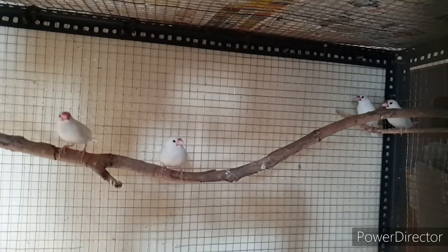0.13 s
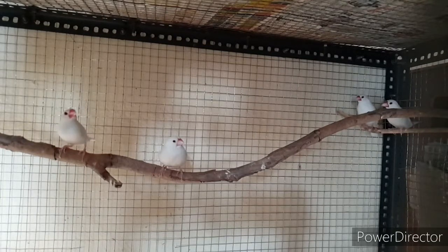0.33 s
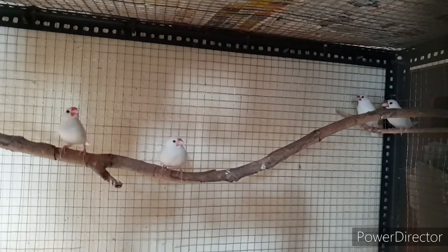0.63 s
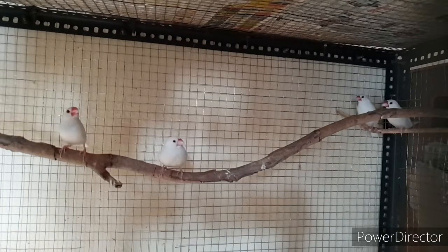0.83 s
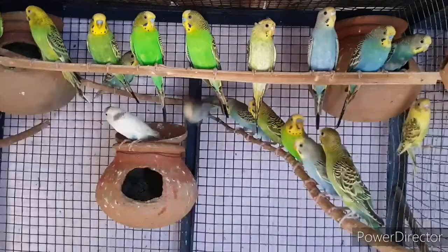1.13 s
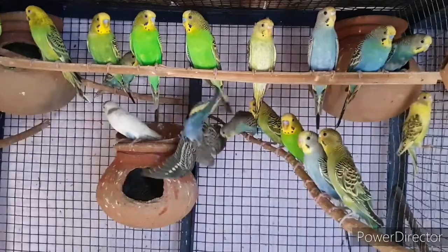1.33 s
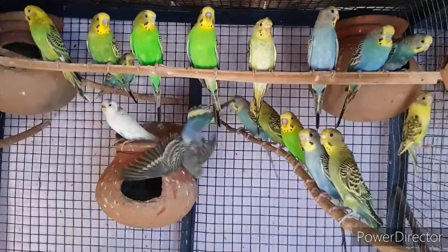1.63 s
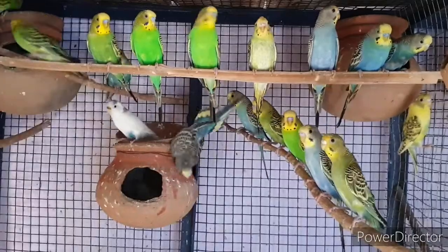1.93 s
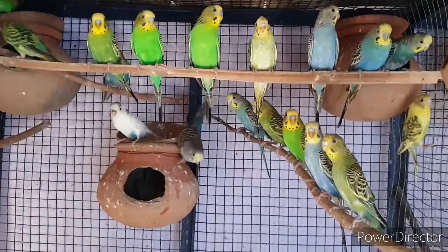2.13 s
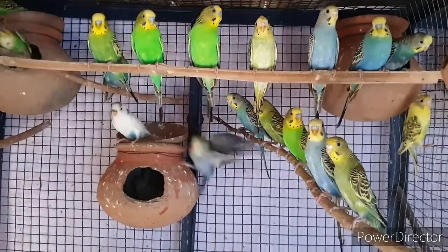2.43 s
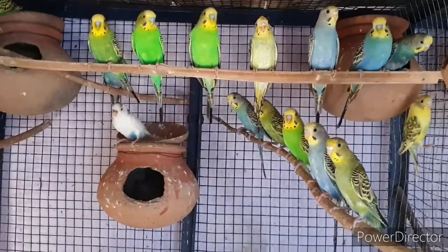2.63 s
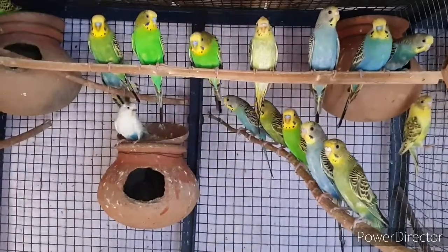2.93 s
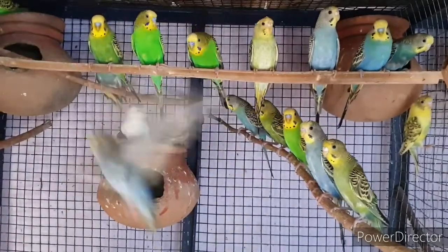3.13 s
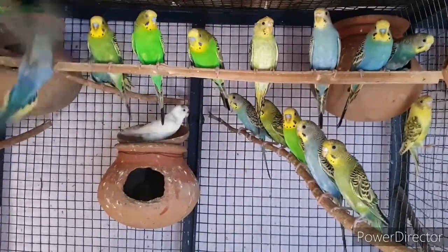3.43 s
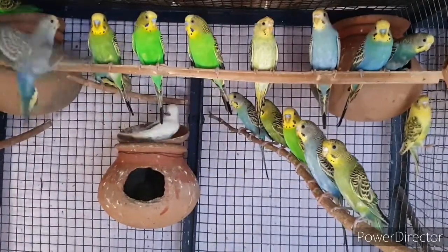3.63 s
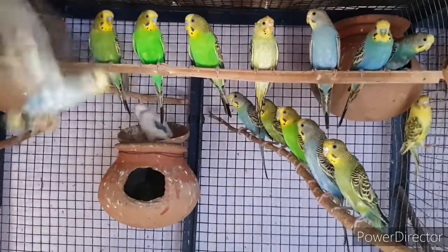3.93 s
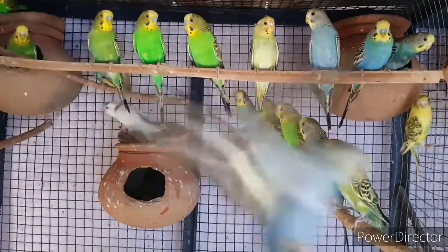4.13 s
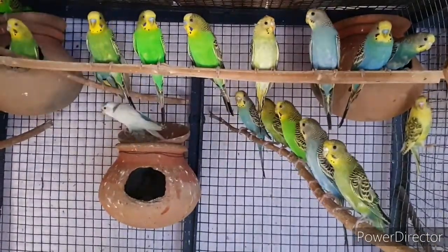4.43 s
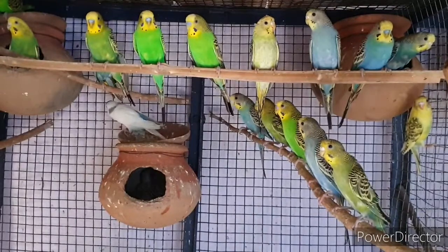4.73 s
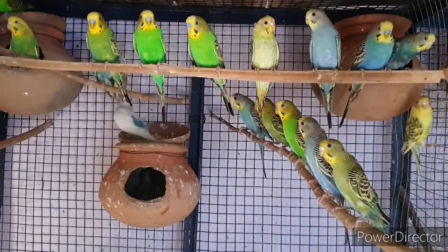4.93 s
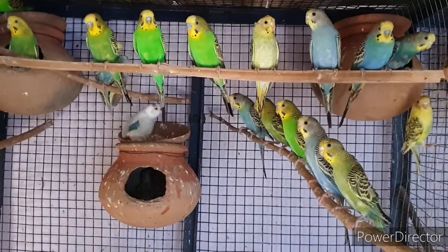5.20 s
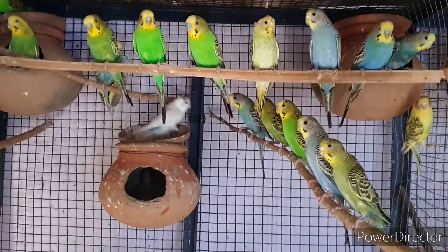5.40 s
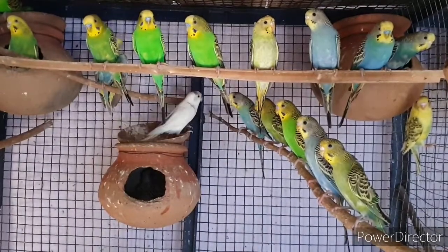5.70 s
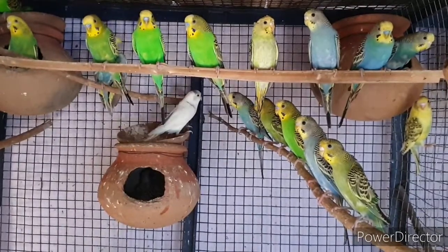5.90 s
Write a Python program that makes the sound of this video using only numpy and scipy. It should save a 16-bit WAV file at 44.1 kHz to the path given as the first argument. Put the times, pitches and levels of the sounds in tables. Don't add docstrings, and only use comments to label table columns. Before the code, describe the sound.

From 0 to 1.17 s there is only a faint, dull low hush, with distant muffled knocks around 0.1 and 0.4 s, the last ringing softly. The scene then switches abruptly to a close, hard-walled cage: a parakeet scolds in ten harsh squawks until 2.73 s, mixing short barks and longer throbbing rasps, loudest near 1.4-2.1 s, with light fluttering and hollow clay-pot puffs beneath. From 2.7 to 3.3 s a long wing pass whooshes by with feather hiss; sharp slaps and claw knocks follow near 3.5 s. Faint gliding chirps come around 3.9-4.1 s. Heavier wingbeat bursts at 4.1-4.7 s thump and hiss, then crisp slaps and hollow pot hoots at 4.8-5.2 s. Activity drops; a sharp landing slap with clicks at 5.5 s, brief gritty rustles and tiny high chirps follow, fading into quiet with a barely audible thin whine and faint hollow puffs near 5.8 s.

```python
import sys
import numpy as np
from scipy import signal
from scipy.fft import rfft, irfft, next_fast_len
from scipy.io import wavfile
from scipy.ndimage import uniform_filter1d

SR = 44100
rng = np.random.default_rng(int(sys.argv[2]) if len(sys.argv) > 2 else 0)


def natural_amplitude(level_db):
    exponent = np.asarray(level_db, float) / 20
    return 10 ** exponent


def transcribe(u):
    v = np.clip(np.atleast_2d(u).T, -1, 1)
    q = np.round(v * 32767).astype(np.int16)
    wavfile.write(sys.argv[1], SR, q)


N = 267201
T = np.arange(N) / SR
WIDE = next_fast_len(N)
HZ = np.fft.rfftfreq(WIDE, 1 / SR)
CUT_S = 1.166

# start_s, length_s, gain_db, second partial start_hz, end_hz
SQUAWK_CALLS = [
    (1.165, 0.056, 1.5, 4480, 4000),
    (1.213, 0.14, 3, 5140, 5600),
    (1.392, 0.074, 4, 4430, 4730),
    (1.518, 0.079, 3.5, 4476, 4860),
    (1.652, .085, 2, 4370, 5050),
    (1.806, 0.13, 3, 5270, 4900),
    (2.004, 0.12, 2.5, 5063, 5100),
    (2.321, .066, 2, 4700, 5200),
    (2.448, 0.076, 2, 5270, 4600),
    (2.613, 0.12, 2.5, 4690, 5300),
]
# pitch_hz, level_db (per Hz)
WHOOSH_COLOUR = [(150, -8.5), (250, -0.5), (410, -4.5), (530, -2), (780, -5), (1200, -11), (1560, -16),
                 (2640, -120)]
# pitch_hz, level_db (per Hz)
HISS_COLOUR = [(590, -1.5), (1000, -9.5), (1210, -2), (2420, -2.5), (2780, -1), (4950, 0.5), (6740, -5),
               (7800, -13), (10100, -115), (17200, -120)]
# pitch_hz, level_db (per Hz)
SHEEN_COLOUR = [(4710, -23.5), (8100, -10.5), (9200, -2), (10800, 4), (12500, 1.5), (14800, -3), (16000, 2)]


def rms_one(x):
    return x / np.sqrt(np.mean(x ** 2) + 1e-20)


def at_hz(points, hz):
    table = np.array(points)
    return np.interp(np.log(hz + 1), np.log(table[:, 0]), table[:, 1])


def drift(rate_hz, size=N):
    r = np.exp(-2 * np.pi * rate_hz / SR)
    return rms_one(signal.lfilter([1], [1, -2 * r, r * r], rng.standard_normal(size + 9000))[9000:])


def band(x, low_hz, high_hz):
    return signal.sosfilt(signal.butter(2, [low_hz, high_hz], "band", fs=SR, output="sos"), x)


def filtered(x, gain):
    return irfft(rfft(x, WIDE) * gain, WIDE)[..., :N]


def air(spectrum, alike=0.95, patchy_db=0, patch_hz=20):
    # pitch_hz, likeness (-1 to 1)
    port_likeness = [(60, -0.074), (180, 0.88), (550, 0.69), (1650, -0.24), (4970, 0.044), (15000, -0.37)]
    shared = np.clip(alike * at_hz(port_likeness, HZ), 0, 1)
    mid, side = rfft(rng.standard_normal((2, WIDE)))
    both = np.sqrt(1 + shared) * mid + np.sqrt(1 - shared) * side * [[1], [-1]]
    both = both * natural_amplitude(at_hz(spectrum, HZ))
    if not patchy_db:
        return rms_one(irfft(both, WIDE)[:, :N])
    place = 4 * np.log2(HZ + 1) % 6
    out = 0
    for k in range(6):
        window = np.clip(1 - np.abs((place - k + 3) % 6 - 3), 0, 1)
        out = out + irfft(both * window, WIDE)[:, :N] * natural_amplitude(patchy_db * drift(patch_hz))
    return rms_one(out)


def even(x):
    return x / np.sqrt(uniform_filter1d(x ** 2, size=900) + 1e-12)


def spans(calls):
    for s, length, *_ in calls:
        a, b = int(s * SR), int((s + length) * SR)
        yield slice(a, b), np.linspace(0, 1, b - a), signal.windows.tukey(b - a, 0.05)


def glide(start, end, t):
    return start + (end - start) * t


def phase(hz):
    return np.cumsum(2 * np.pi * hz / SR)


def aviary():
    # pitch_hz, level_db (per Hz)
    hush_colour = [(12, -27), (20, 10.5), (46, -10), (101, -16), (260, -21), (315, -27), (462, -22),
                   (694, -25.5), (789, -19), (936, -38), (1040, -46), (1320, -30), (1740, -27.5),
                   (2900, -36), (3300, -55), (4290, -84), (7260, -120)]
    # time_s, level_db, t60_s
    far_hits = [
        (0.116, -61, 0.51),
        (.385, -63, 0.35),
        (0.446, -59, 0.96),
    ]
    # centre_hz, width_hz, level_db
    wall_modes = [(750, 260, -2.5), (1340, 220, 2), (1770, 490, 0)]
    colour = sum(natural_amplitude(db) / (1 + (2 * (HZ - centre) / width) ** 4) for centre, width, db in wall_modes)
    ring = rms_one(filtered(rng.standard_normal((2, WIDE)), colour))
    fade = 0
    for s, level_db, t60 in far_hits:
        onset = np.clip((T - s) / 0.004, 0, 1)
        fade = fade + onset * natural_amplitude(level_db - 60 * np.abs(T - s) / t60)
    hush = natural_amplitude(-56.5 - 2.9 * T + 0.4 * drift(1.2)) * air(hush_colour, alike=0.14)
    return (hush + fade * ring * natural_amplitude([[3], [-4]])) * (T < CUT_S)


def hoarse_band(hz):
    width_hz = 185
    turn = phase(hz)
    return drift(width_hz, len(hz)) * np.sin(turn) + drift(width_hz, len(hz)) * np.cos(turn)


def squawks():
    # rasp (0-1), throb depth (0-1), fundamental_db, treble_db, left-right_db
    timbres = [(0.6, 0, -1, -2.5, 4.5), (.5, 0.65, 1.5, 3, -2.5), (.16, 0.7, -1, -1.5, 0),
               (0.18, 0.48, -3, -2.5, -1), (.08, 0.84, -1.5, -3.5, -5), (0.9, 0.4, 3, 5.5, -2),
               (.25, 0.5, 1.5, -1.5, 1.5), (.2, 0.1, -3.5, 1.5, -3), (.2, 0.2, -1.5, 0.5, -0.5),
               (0.8, 0.5, 0.5, 4, 1)]
    # time_s, level_db
    pressure = [
        [(1.168, -42), (1.176, -34), (1.2, -42), (1.214, -38)],
        [(1.21, -39.5), (1.236, -26.5), (1.248, -30), (1.26, -30.5), (1.264, -26), (1.292, -25), (1.33, -25.5),
         (1.35, -33.5)],
        [(1.393, -30.5), (1.399, -30), (1.408, -24), (1.412, -18.5), (1.436, -21), (1.464, -22.5), (1.468, -34)],
        [(1.52, -30.5), (1.532, -21.5), (1.54, -23.5), (1.552, -20.5), (1.595, -19.5), (1.6, -21.5),
         (1.606, -30.5)],
        [(1.652, -28.5), (1.662, -18), (1.68, -18.5), (1.704, -15), (1.722, -19), (1.733, -17), (1.737, -29.5)],
        [(1.808, -39.5), (1.812, -30), (1.838, -23), (1.87, -26), (1.922, -25), (1.928, -31.5), (1.936, -37)],
        [(2.006, -41), (2.022, -27.5), (2.05, -23.5), (2.07, -20), (2.088, -20), (2.1, -28), (2.126, -41.5)],
        [(2.322, -52), (2.338, -40), (2.372, -29.5), (2.392, -41)],
        [(2.449, -49), (2.453, -34.5), (2.471, -23.5), (2.501, -29), (2.534, -44)],
        [(2.614, -50), (2.628, -37), (2.66, -29), (2.666, -26.5), (2.712, -30.5), (2.739, -55.5)],
    ]
    # upper start_hz, end_hz, upper_db, lower_hz, lower_db, upper arch_hz
    beak_bands = [(5700, 6000, -4.5, 4500, -8, 29), (5800, 5800, -8, 4600, -9.5, 247),
                  (6360, 6000, -9.5, 6000, -9.5, 706), (5660, 5700, -13.5, 3000, -22.5, 1498.5),
                  (6430, 5900, -12.5, 4000, -10, 202), (6210, 5800, -2.5, 4750, -11, -100),
                  (6095, 5900, -13, 4500, -12.5, 199), (5250, 5700, -14.5, 4700, -7.5, 99),
                  (6000, 5800, -11, 4650, -10.5, 50), (4700, 5600, -7.5, 3600, -12, 98)]
    # start_hz, end_hz
    base_pitches = [(2097, 2100), (2823, 2650), (2176, 2250), (2180, 2250), (2110, 2250), (2670, 2650),
                    (2500, 2560), (2393, 2520), (2560, 2500), (2780, 2600)]
    # pitch_hz, level_db (per Hz)
    rasp_colour = [(1940, -28.5), (3400, -6), (3940, -5.5), (4760, -4), (5460, -1.5), (6020, -6),
                   (7600, -9.5), (9880, -39), (16700, -120)]
    # pitch_hz, level_db
    throat_shape = [(1500, -9), (2000, -3.5), (2900, -1), (3450, -9.5), (4100, -1), (6900, -3.5),
                    (7750, -8.5), (8700, 0)]
    bend = 3.2
    throb_hz, wobble_hz, second_voice_hz, coupling = 165.05, 302, 528, 0.16

    out, pan_db, breath = np.zeros((3, N))
    rasp_noise = air(rasp_colour, patchy_db=3.0, patch_hz=30.9)[0]
    low_noise = rms_one(band(band(rng.standard_normal(N), 1870, 4100), 790, 4600))
    tables = zip(spans(SQUAWK_CALLS), SQUAWK_CALLS, pressure, timbres, beak_bands, base_pitches)
    for (at, t, gate), (_, _, gain_db, from_hz, to_hz), effort, timbre, beak, base in tables:
        n = len(t)
        rasp, throb, first_db, treble_db, pan_db[at] = timbre
        upper_from_hz, upper_to_hz, upper_db, lower_hz, lower_db, arch_hz = beak
        level_db = gain_db + np.interp(T[at], *np.transpose(effort))
        low_db = first_db - 22 - 0.39 * level_db

        flex = 1 + (0.0057 + 0.1533 * rasp) * drift(wobble_hz, n) + 0.012 * drift(60.3, n)
        first_hz = glide(*base, t ** bend)
        first = phase(first_hz * flex)
        turn = phase(glide(from_hz, to_hz, t ** bend) / 2 * flex)
        other = phase(second_voice_hz * (1 + 0.1504 * drift(27.1, n)))
        turn = turn + coupling * natural_amplitude(5.4 * drift(45, n)) * np.sin(other)

        beat = phase(throb_hz * (1 + 0.299 * drift(69, n)))
        pulse = 1 + np.clip(throb, 0, 1) * np.sin(beat)
        pulse = pulse * natural_amplitude((1.4 + 3.5 * rasp) * drift(440, n))
        share = np.clip(rasp, 0, 1)
        tone, hoarse = np.sqrt(2 * (1 - share)), np.sqrt(share)

        third = natural_amplitude(-17 + 2.5 * drift(7.1, n)) * np.sin(3 * first)
        upper_hz = glide(upper_from_hz, upper_to_hz, t) + arch_hz * np.sin(np.pi * t)
        upper = natural_amplitude(upper_db + 3.62 * drift(25, n)) * hoarse_band(upper_hz)
        lower = natural_amplitude(lower_db + 4.7 * drift(27, n)) * hoarse_band(lower_hz + 0 * t)
        main = tone * (np.sin(2 * turn) + third) + 0.6 * hoarse * rasp_noise[at] + upper + lower

        low_rasp = 3.15 * low_noise[at] + 1.5 * (1 - share) * hoarse_band(first_hz)
        low = tone * natural_amplitude(4.0 * drift(40, n)) * np.sin(first) + share * low_rasp
        top = 0.66 * tone * (np.sin(4 * turn) + 0.5 * np.sin(5 * turn) + 0.41 * np.sin(6 * turn))

        sound = even(pulse * main)
        sound = sound + natural_amplitude(low_db + 1.5 * drift(26, n)) * even(pulse * low)
        sound = sound + natural_amplitude(-19.5 + treble_db) * pulse * top
        out[at] += gate * natural_amplitude(level_db) * sound
        breath[at] += gate * natural_amplitude(level_db - 24.5 + treble_db) * pulse
    voice = filtered(out, natural_amplitude(at_hz(throat_shape, HZ)))
    return voice, pan_db, breath * air(SHEEN_COLOUR, patchy_db=2.5, patch_hz=30.3)


def bars(voice, pan_db):
    lag_samples = 2.5
    late = filtered(voice, np.exp(-2j * np.pi * HZ / SR * lag_samples))
    direct = np.array([voice * natural_amplitude(pan_db / 2), late * natural_amplitude(-pan_db / 2)])
    out = np.zeros((2, N))
    for at, _, _ in spans(SQUAWK_CALLS):
        paths = np.zeros((2, 400))
        lags, signs = rng.integers(6, 400, (2, 9)), rng.choice([-1, 1], (2, 9))
        paths[[[0], [1]], lags] = 0.91 * signs * np.exp(-lags / 200)
        paths[:, 0] = 1
        echoed = signal.fftconvolve(direct[:, at], paths, axes=1)
        keep = np.linalg.norm(direct[:, at], axis=1) / np.linalg.norm(echoed, axis=1)
        out[:, at.start:at.stop + 399] += 1.4 * keep[:, None] * echoed
    return out


def room_floor():
    # pitch_hz, level_db (per Hz)
    floor_colour = [(12, -38.5), (20, -0.5), (80, -3), (393, -10), (491, -6), (614, -38), (857, -26),
                    (1670, -17.5), (3450, -23), (6190, -17.5), (8400, -41), (11100, -29.5), (15500, -31)]
    return natural_amplitude(-62 + 1.0 * drift(7)) * air(floor_colour, patchy_db=2.5, patch_hz=9) * (T > CUT_S)


def room(x):
    t60_s, level_db, wall_cut_hz = 0.39, -4.5, 5800
    t = T[:int(0.6 * SR)]
    white = rng.standard_normal((2, len(t)))
    dull = signal.sosfilt(signal.butter(1, wall_cut_hz, fs=SR, output="sos"), white)
    tail = dull * natural_amplitude(-60 * t / t60_s) + 1.78 * white * natural_amplitude(-60 * t / 0.066)
    tail = tail * np.minimum(t / 0.00041, 1)
    tail = tail / np.sqrt(np.sum(tail ** 2) / 2)
    return natural_amplitude(level_db) * signal.fftconvolve(x[None], tail, axes=1)[:, :N]


def stir_db():
    # start_s, length_s, rumble_db, whoosh_db, hiss_db
    wing_spells = [(1.172, 1.55, -54.5, -58, -99), (1.283, 0.074, -69, -45.5, -85),
                   (1.838, 0.18, -54, -78, -92), (2.658, 0.062, -44.5, -40.5, -41.5),
                   (2.779, 0.28, -40.5, -43, -48.5), (3.013, 0.23, -44, -47, -51),
                   (3.257, 0.22, -49, -50.5, -50.5), (3.567, 0.07, -46, -47.5, -53.5),
                   (3.684, 0.15, -52, -65, -62.5), (3.938, 0.2, -49, -49, -53.5),
                   (4.118, 0.11, -41.5, -51.5, -55.5), (4.29, 0.062, -34.5, -42.5, -43.5),
                   (4.381, 0.12, -41, -52.5, -54), (4.592, 0.13, -39.5, -53.5, -54),
                   (4.815, 0.11, -46, -49, -46), (4.945, 0.1, -43.5, -46.5, -51),
                   (5.077, 0.01, -39, -46.5, -52), (5.117, 0.065, -37.5, -46, -50.5),
                   (5.22, 0.075, -43.5, -56, -87), (5.515, 0.015, -43.5, -63, -92),
                   (5.837, 0.034, -83.5, -69, -86.5)]
    # rumble, whoosh, hiss level_db
    still_air = [
        [-83],
        [-66.5],
        [-88.5],
    ]
    rise_db_per_s, fall_db_per_s = 296, 177
    t = T[::64]
    power = natural_amplitude(2 * np.array(still_air)) + 0 * t
    for s, length, *levels_db in wing_spells:
        away_db = rise_db_per_s * np.maximum(s - t, 0) + fall_db_per_s * np.maximum(t - s - length, 0)
        power = power + natural_amplitude(2 * (np.array(levels_db)[:, None] - away_db))
    return [np.interp(T, t, 10 * np.log10(p)) for p in power]


def wings():
    # first downstroke_s, last_s, beat period_s, swing_hz, upstroke share
    flights = [
        (1.84, 2.13, 0.045, 98.1, 1),
        (2.761, 3.24, 0.048, 89, 0.69),
        (4.134, 4.26, 0.061, 57.6, 0.28),
        (4.3, 4.46, 0.052, 61.6, 0.24),
        (4.586, 4.7, 0.053, 61.3, 0.17),
        (5.112, 5.19, 0.026, 94, 0.59),
        (5.537, 5.55, 0.012, 60.6, 0.52),
    ]
    # pitch_hz, level_db (per Hz)
    rumble_colour = [(12, -21), (20, -23), (43, 4), (59, 7), (108, 8.5), (256, -5.5), (280, -15.5),
                     (360, -52.5), (620, -120)]
    quills_per_s, quill_db = 160, 3.5
    push, swell = np.zeros((2, N))
    for first, last, period, swing_hz, upstroke in flights:
        sizes = natural_amplitude(2.5 + rng.normal(0, 0.43, 30))
        for k, s in enumerate(np.arange(first, last, period / 2)):
            at = slice(int((s - 0.03) * SR), int((s + 0.04) * SR))
            since = T[at] - s
            shape = np.exp(-(since * swing_hz / np.where(since < 0, 0.55, 0.9)) ** 2)
            swing = shape * np.cos(2 * np.pi * swing_hz * since)
            push[at] += sizes[k] * (upstroke if k % 2 else -1) * swing
            swell[at] += np.exp(-(since / 0.0041) ** 2)
    rumble_db, whoosh_db, hiss_db = stir_db()
    sheen_db = np.minimum(-39 - 0.64 * hiss_db, -2.5)

    snaps = (rng.random(N) < quills_per_s / SR) * rng.exponential(1, N)
    snapping = np.minimum(signal.lfilter([1], [1, -np.exp(-1 / (0.003 * SR))], snaps), 2)
    grain_db = 2.02 * drift(50) + 0.89 * drift(294) + quill_db * snapping - 2

    flying = uniform_filter1d(swell, size=2500) > 0.1
    rumble_air = natural_amplitude(-4.5 - 2.4 * flying + 2.51 * drift(27)) * air(rumble_colour)
    rumble = natural_amplitude(rumble_db) * (push + rumble_air)
    whoosh = natural_amplitude(whoosh_db - 5.5 + 2.3 * swell + 2.0 * drift(50))
    whoosh = whoosh * air(WHOOSH_COLOUR, patchy_db=3.0, patch_hz=35.5)
    feathers = air(HISS_COLOUR, patchy_db=-1.5, patch_hz=25.04) + natural_amplitude(sheen_db) * air(SHEEN_COLOUR)
    hiss = natural_amplitude(hiss_db - 3.0 + 0.76 * swell + grain_db) * feathers
    return (rumble + whoosh + hiss) * (T > CUT_S)


def draughts():
    # start_s, length_s, level_db, cavity_hz
    pot_draughts = [
        (1.29, 0.081, -48.5, 351),
        (2.738, 0.31, -46, 531),
        (2.989, .27, -49, 560),
        (3.96, 0.15, -53, 503),
        (4.257, 0.15, -45, 519.5),
        (4.459, 0.051, -48, 361.5),
        (4.981, .2, -56, 600),
        (5.302, .2, -65, 560),
    ]
    cavity_width_hz, throb_hz = 70, 20
    out = np.zeros((2, N))
    for (at, t, _), (_, _, level_db, hz) in zip(spans(pot_draughts), pot_draughts):
        n = len(t)
        turn = phase(hz * (1 + 0.06 * drift(12, n)))
        sway = [drift(cavity_width_hz, n) for _ in range(3)]
        throb_db = 4.7 * np.sin(2 * np.pi * throb_hz * T[at])
        centre = sway[0] * np.sin(turn) + sway[1] * np.cos(turn)
        sides = 0.4 * sway[2] * np.sin(turn) * [[1], [-1]]
        out[:, at] += natural_amplitude(level_db - 5 + throb_db) * np.sin(np.pi * t) ** 0.26 * (centre + sides)
    return out


def pots():
    # start_s, length_s, peak_db, start_hz, end_hz
    pot_hoots = [(2.061, 0.075, -37.5, 354.6, 414), (2.163, 0.061, -43.5, 389, 394),
                 (4.801, 0.035, -33, 370, 353), (4.837, 0.047, -35, 370, 364), (4.89, 0.032, -43, 372, 370),
                 (5.224, 0.09, -41, 418.6, 430), (5.39, 0.083, -61, 684, 690),
                 (5.438, 0.072, -58, 669, 710), (5.782, 0.048, -62.5, 644, 700),
                 (5.854, 0.045, -52.5, 699, 920), (5.873, 0.045, -52.5, 573, 620),
                 (5.889, .025, -53, 925, 1040)]
    out = np.zeros(N)
    for (at, t, gate), (_, _, peak_db, from_hz, to_hz) in zip(spans(pot_hoots), pot_hoots):
        turn = phase(glide(from_hz, to_hz, t) * (1 + 0.037 * drift(34, len(t))))
        level_db = peak_db + np.interp(t, [0, 0.28, 1], [-18, 0, -13])
        out[at] += gate * natural_amplitude(level_db - 2.5 + 1.2 * drift(30, len(t))) * np.sin(turn)
    return out


def chirps():
    # start_s, length_s, peak_db, start_hz, end_hz
    whistles = [(2.419, 0.024, -55, 1720, 1960), (3.846, 0.031, -63, 1940, 1740),
                (3.865, 0.06, -59, 1737, 2080), (3.915, 0.052, -57.5, 2170, 2230),
                (4.073, 0.06, -65, 1394, 1330), (4.14, 0.08, -61, 1370, 1530),
                (4.545, 0.007, -55, 1260, 1270), (4.576, 0.016, -53, 1226, 1300),
                (3.878, 0.035, -68, 5440, 5500), (4.112, .04, -64, 5600, 5400),
                (5.495, .045, -56, 6050, 5950), (5.589, .03, -60, 6100, 6000),
                (5.586, .04, -71, 2640, 2750), (4.507, .01, -63, 1300, 1320)]
    # start_db, end_db
    overtones = [(20, -4), (-26.5, -20), (11, -20), (-25, -25), (18, -8), (5, -13), (-11, -15), (-8, -10),
                 (-40, -40), (-40, -42), (-30, -30), (-30.5, -30), (-30, -30), (-12, -12)]
    out = np.zeros(N)
    for (at, t, gate), whistle, (from_db, to_db) in zip(spans(whistles), whistles, overtones):
        _, _, peak_db, from_hz, to_hz = whistle
        turn = phase(glide(from_hz, to_hz, t) * (1 + 0.016 * drift(170, len(t))))
        waver = natural_amplitude(peak_db + 3.5 + 2.3 * drift(60, len(t))) * np.sin(np.pi * t) ** 0.5
        second = natural_amplitude(glide(from_db, to_db, t ** 0.87)) * np.sin(2 * turn)
        out[at] += gate * waver * (np.sin(turn) + second)
    return out


def slaps():
    # time_s, peak_db, thump_db (re peak), length_s
    single_slaps = [(2.597, -40, -10, 0.13), (2.909, -41, 3, 0.051), (3.025, -42, -8, 0.04),
                    (3.196, -40, -24, 0.13), (3.261, -41.5, -10, 0.27), (3.285, -34, -23, 0.026),
                    (3.297, -35.5, -3, 0.057), (3.391, -41, -16, 0.096), (3.46, -35.5, 2, 0.045),
                    (3.519, -29, -29, 0.069), (3.568, -39.5, -8, .03), (3.572, -28.5, -6.5, 0.077),
                    (3.684, -45, -13, 0.054), (3.769, -45, -6.5, 0.15), (3.874, -47.5, -22, 0.071),
                    (3.905, -38.5, -34, 0.053), (3.955, -30, -28, 0.042), (4.483, -41.5, -18, 0.048),
                    (4.582, -37, -10, 0.044), (4.629, -35.5, -19.5, 0.01), (4.648, -25.5, -26, 0.056),
                    (4.68, -32, -20, 0.041), (4.705, -41, -23, 0.094), (4.737, -44, -23, 0.075),
                    (4.802, -39.5, 5.5, 0.067), (5.517, -25.5, 0.5, 0.022)]
    # time_s, peak_db, thump_db (re peak)
    caught_strokes = [(2.8327, -42.5, -11), (2.8826, -35, -12), (2.9236, -37, 8), (2.96, -40.5, -1),
                      (2.9745, -36, -14), (3.061, -34.5, -6), (3.0813, -38.5, -9), (3.117, -42, 2),
                      (3.341, -37, 3), (3.55, -31, -7), (3.832, -43.5, -13), (4.009, -39, -7),
                      (4.0491, -46.5, -11), (4.0783, -45, -9), (4.1113, -42, -10), (4.2115, -46, -11),
                      (4.2268, -38.5, -8), (4.2668, -37, -12), (4.3162, -25.5, -6), (4.437, -47.5, -3),
                      (4.598, -42, -12), (4.8414, -36.5, 6.5), (4.891, -25.5, -16), (4.9327, -25.5, -16),
                      (4.9797, -30, -28), (5.013, -30.5, -19), (5.088, -39.5, -4)]
    stroke_t60_s, stroke_db, sheen_db = 0.044, -4, -4
    strokes = [(s, db + stroke_db, low_db, stroke_t60_s) for s, db, low_db in caught_strokes]
    bright, thump, tick = np.zeros((3, N))
    t = T[:6000]
    for s, peak_db, thump_db, length in single_slaps + strokes:
        a = int(s * SR)
        fade = natural_amplitude(peak_db - 5.5 - 60 * t / max(length, 0.004)) * np.minimum(t / 0.0016, 1)
        bright[a:a + len(t)] += fade
        thump[a:a + len(t)] += fade * natural_amplitude(thump_db)
        tick[a + 80] += natural_amplitude(peak_db - 26.5)
    crackle = natural_amplitude(2.5 * drift(600))
    feathers = air(HISS_COLOUR, patchy_db=3.5, patch_hz=39.7) + natural_amplitude(sheen_db) * air(SHEEN_COLOUR)
    return crackle * bright * feathers + thump * air(WHOOSH_COLOUR) + band(tick, 1200, 7000)


def knocks():
    # time_s, peak_db, ring_hz, t60_s
    contacts = [(3.524, -26.5, 1130, 0.0077), (3.5742, -25, 855, 0.016), (3.9072, -27.5, 5500, 0.0021),
                (4.032, -36, 540, 0.043), (2.7, -48, 780, 0.035), (3.7, -51, 630, 0.02),
                (4.574, -33, 140, .03), (4, -41, 850, .04), (3.9, -38, 170, .05), (3.7, -34, 200, .03),
                (4.651, -37.5, 1420, 0.022), (5.5183, -30.5, 1520, 0.012), (5.5172, -31, 500, 0.016),
                (5.535, -46.5, 259, 0.11), (5.517, -33, 196, .02), (5.497, -41, 5860, .01),
                (4.683, -36, 3550, 0.014), (3.287, -34, 5600, .01), (4.5, -35.5, 6500, .004),
                (2.722, -31, 500, 0.06), (2.778, -34.5, 576, 0.033)]
    out, t = np.zeros(N), T[:4000]
    for s, peak_db, hz, t60 in contacts:
        a = int(s * SR)
        out[a:a + len(t)] += natural_amplitude(peak_db - 60 * t / t60) * np.sin(2 * np.pi * hz * t)
    return out


def rustles():
    # start_s, length_s, level_db, dull part_db
    husk_swells = [
        (3.425, 0.05, -49.5, -18),
        (5.497, 0.061, -48.5, -20),
        (5.558, 0.046, -53, -13.5),
        (5.591, 0.033, -52, -21),
        (5.832, 0.105, -75, 6.5),
        (5.882, 0.048, -63.5, 5),
    ]
    # pitch_hz, level_db (per Hz)
    grit_colour = [(2060, -50.5), (3500, -16), (6020, 0), (7300, -11.5), (8160, -25.5), (10200, -6.5),
                   (12300, -4.5), (15500, -18)]
    grit = natural_amplitude(3.9 * drift(130)) * air(grit_colour)
    puff = 0.48 * air(WHOOSH_COLOUR) + 1.8 * air(HISS_COLOUR)
    out = 0
    for s, length, level_db, dull_db in husk_swells:
        progress = np.clip((T - s) / length, 0, 1)
        swell = np.clip(np.sin(np.pi * progress ** 0.65), 0, 1) ** 0.5
        out = out + swell * natural_amplitude(level_db) * (grit + natural_amplitude(dull_db) * puff)
    return out


def whine():
    # pitch_hz, half width_hz, level_db
    thin_hum = (1700, 35, -71)
    hz, width, level_db = thin_hum
    narrow = rms_one(band(rng.standard_normal((2, N)), hz - width, hz + width))
    return natural_amplitude(level_db + 1.2 * drift(8.8)) * narrow * np.exp(-((T - 5.72) / 0.15) ** 2)


def scene():
    voice, pan_db, breath = squawks()
    far = chirps() + pots()
    near = slaps() + knocks() + rustles() + draughts()
    echoes = room(voice + breath[0] + far + 0.54 * near.mean(0))
    scold = natural_amplitude(-1.0) * bars(voice, pan_db) + breath
    return aviary() + scold + far + near + wings() + whine() + room_floor() + echoes


def band_limit(x):
    return signal.sosfilt(signal.butter(12, 15000, fs=SR, output="sos"), x)


def record(dry):
    # pitch_hz, left-right_db
    port_balance = [(60, 2.5), (180, 1.5), (550, 2), (1650, 3.5), (4970, 1.5), (15000, 11)]
    tilt_db = at_hz(port_balance, HZ) / 2
    ports = filtered(dry, natural_amplitude(tilt_db * [[1], [-1]]))
    return band_limit(np.tanh(ports))


dry = scene()
out = record(dry)
transcribe(out)
```